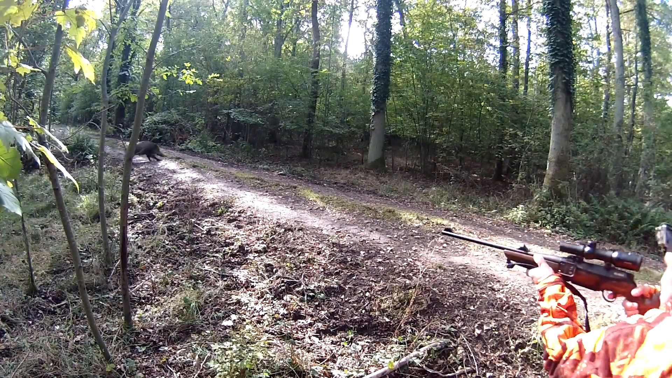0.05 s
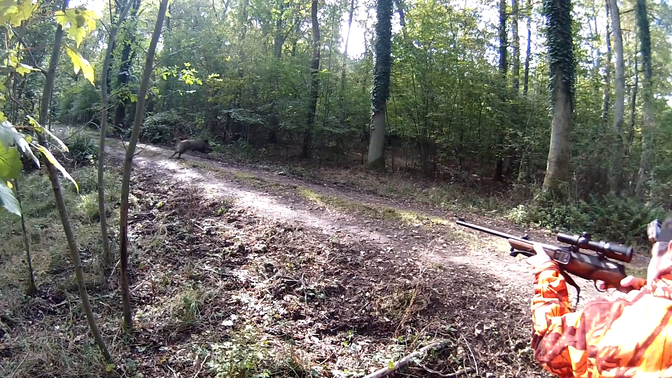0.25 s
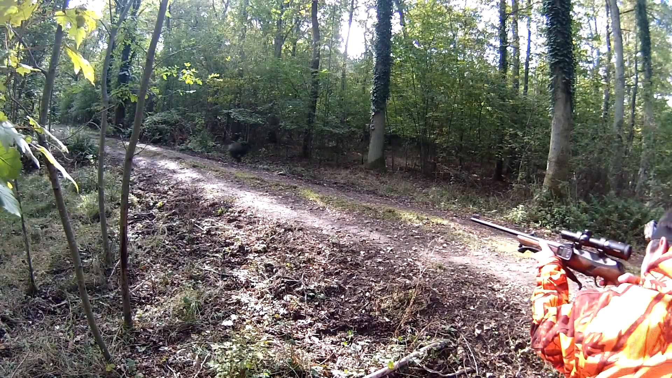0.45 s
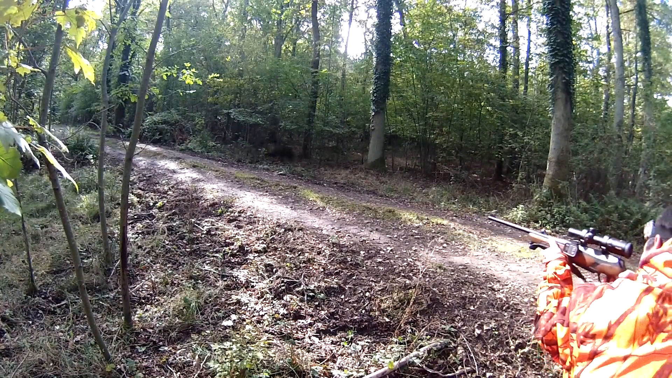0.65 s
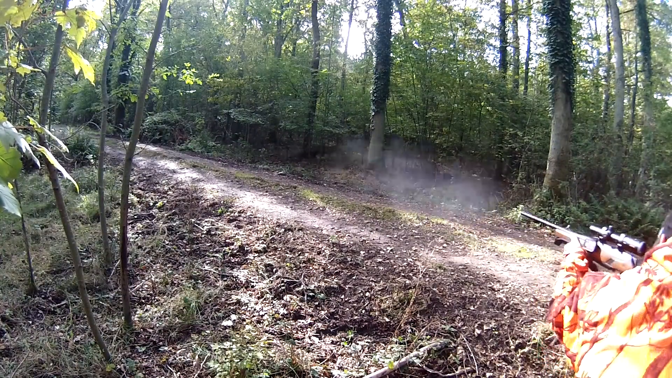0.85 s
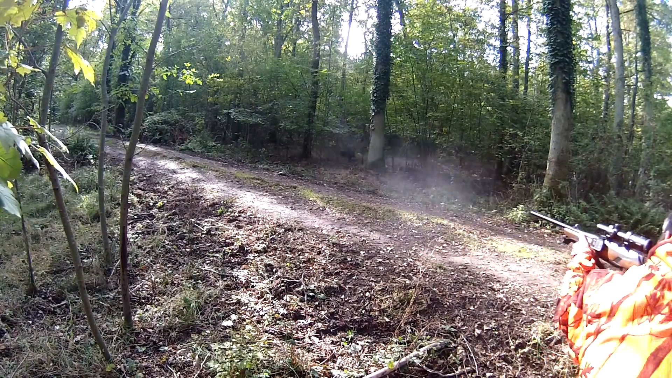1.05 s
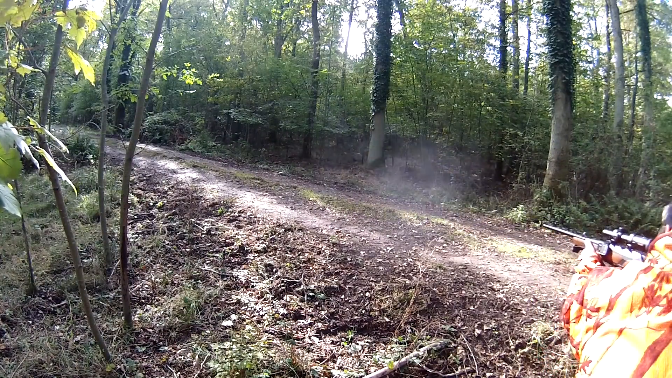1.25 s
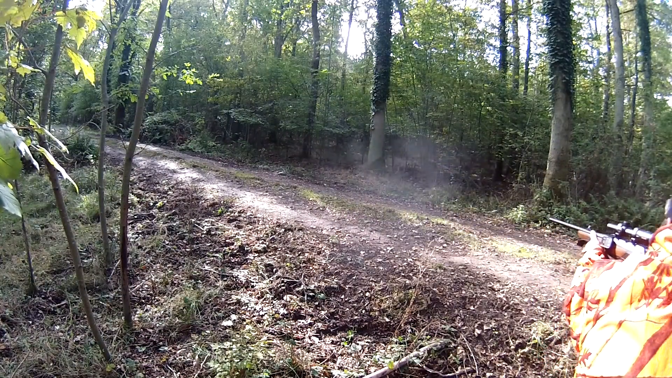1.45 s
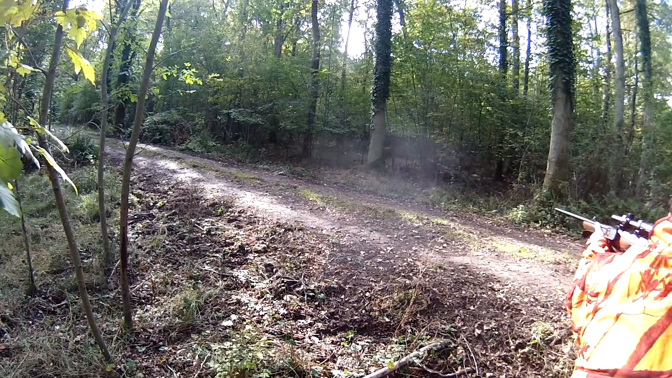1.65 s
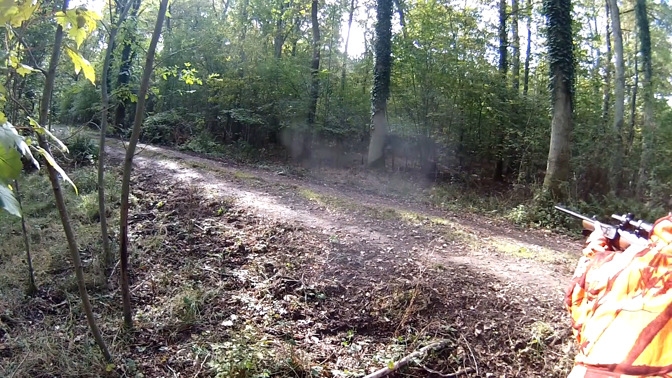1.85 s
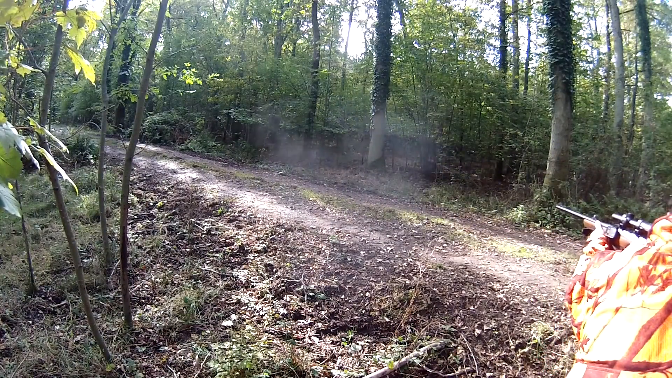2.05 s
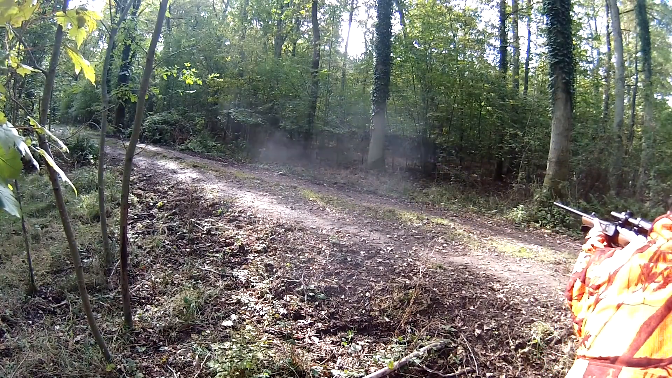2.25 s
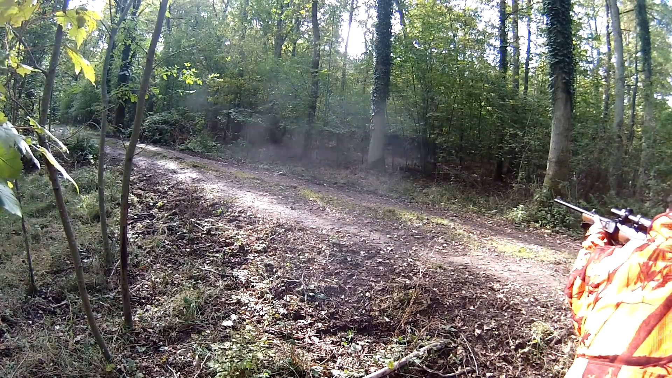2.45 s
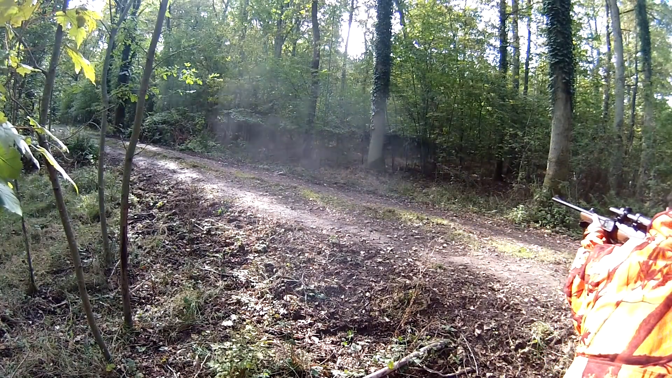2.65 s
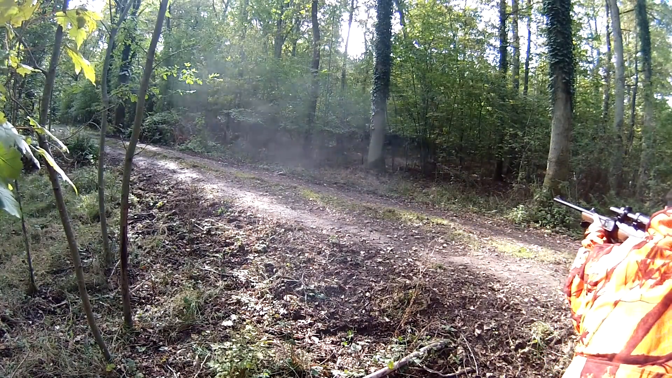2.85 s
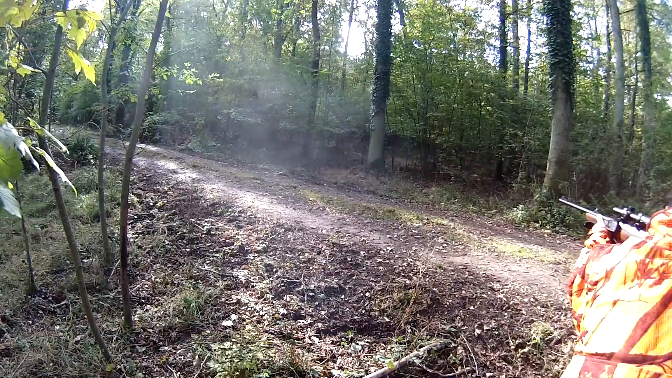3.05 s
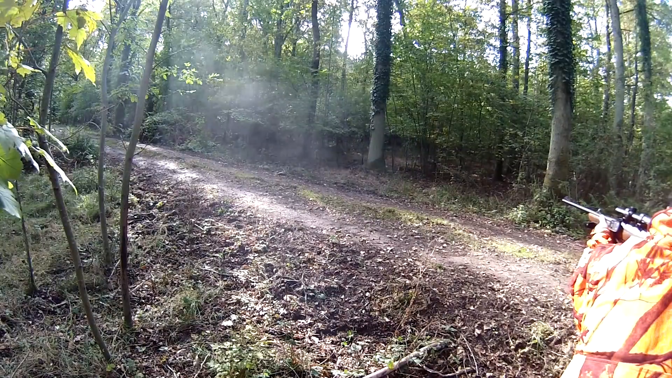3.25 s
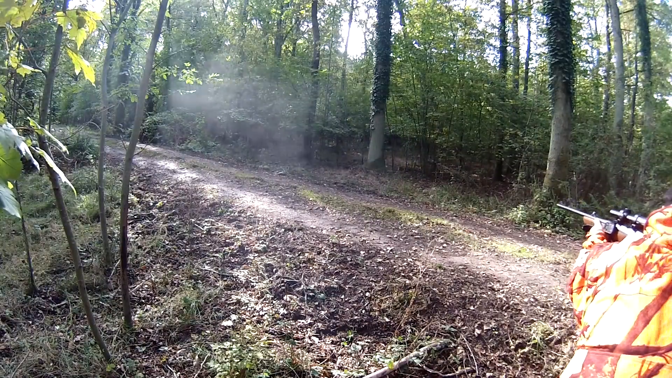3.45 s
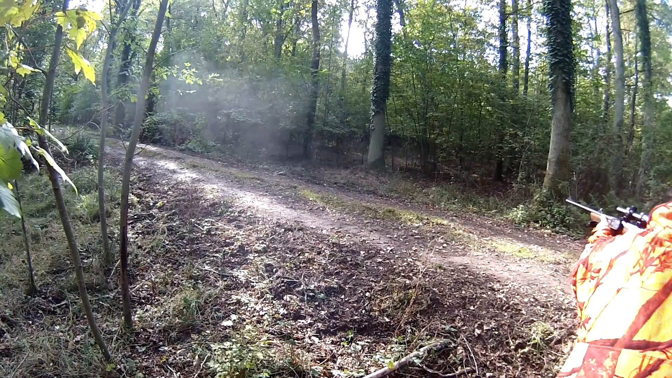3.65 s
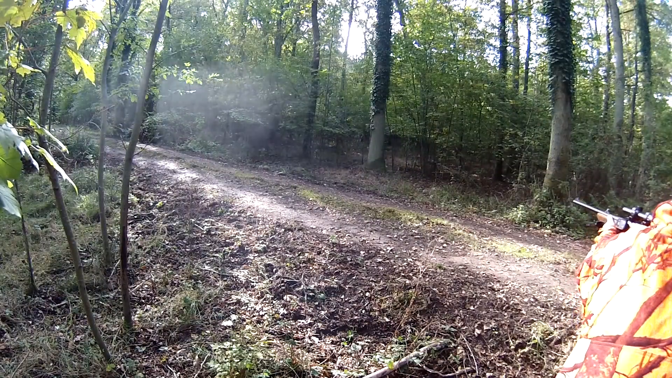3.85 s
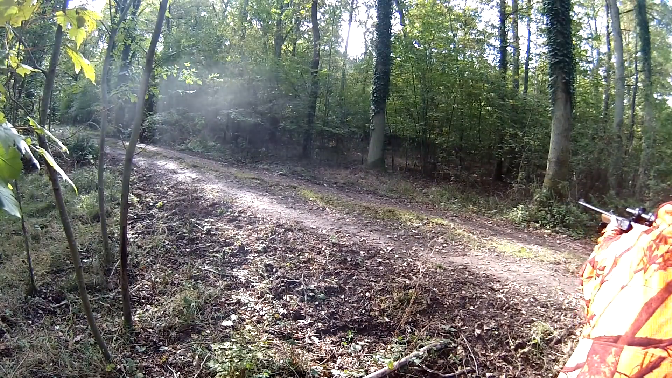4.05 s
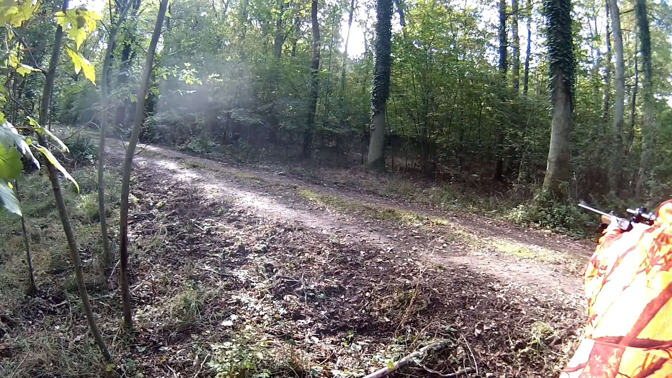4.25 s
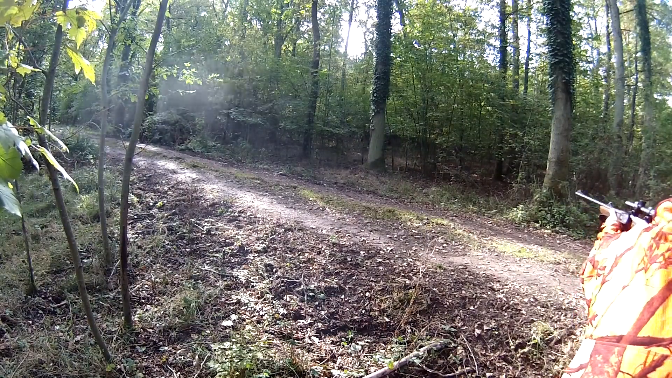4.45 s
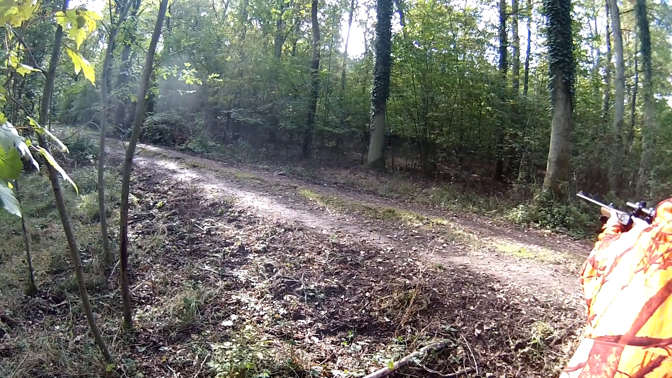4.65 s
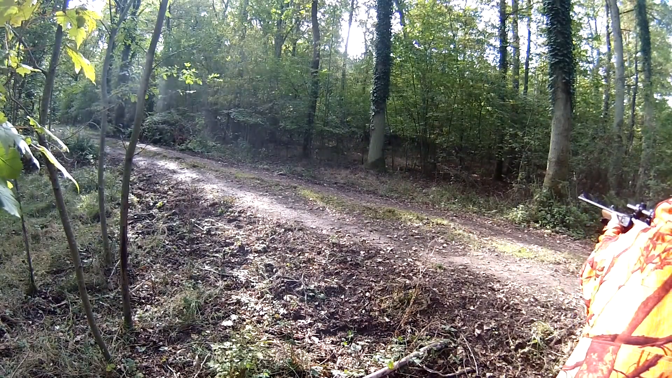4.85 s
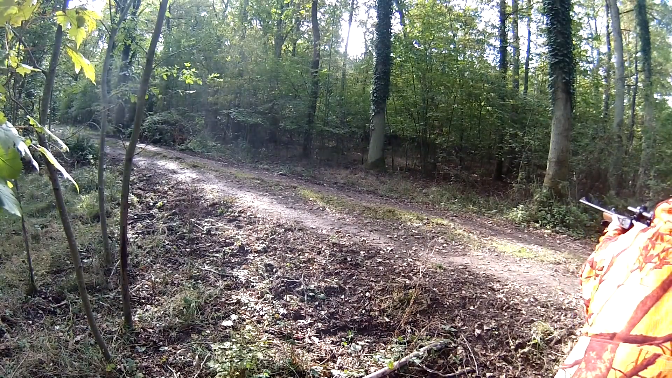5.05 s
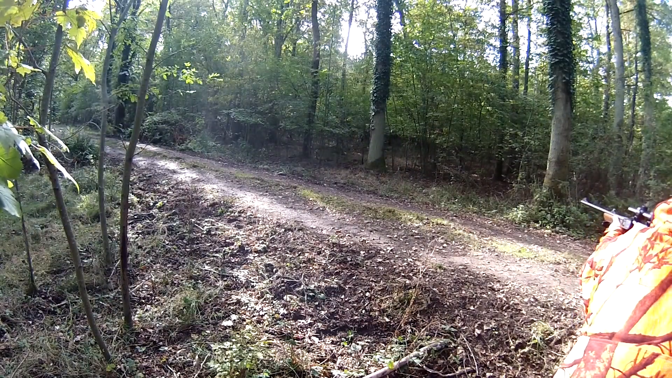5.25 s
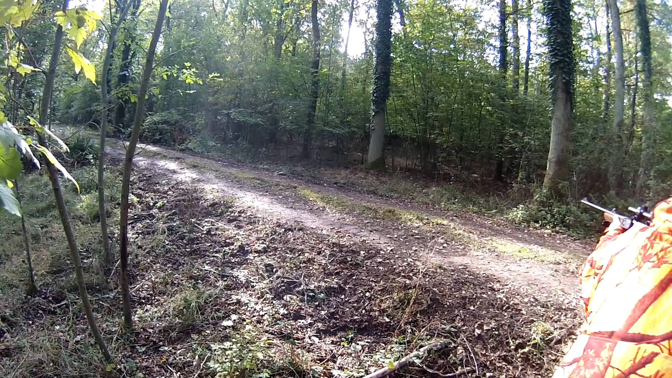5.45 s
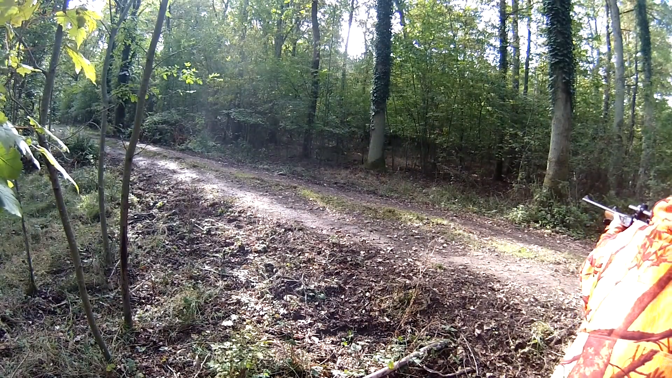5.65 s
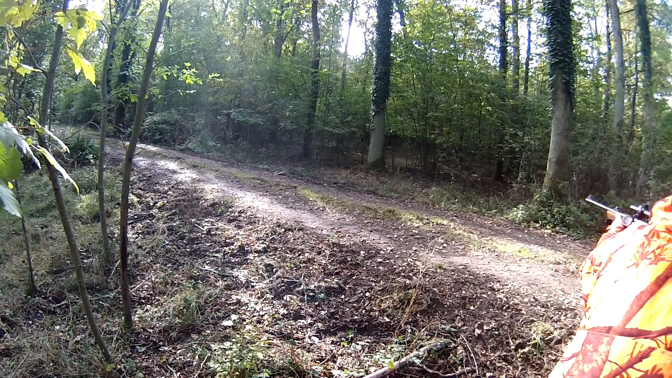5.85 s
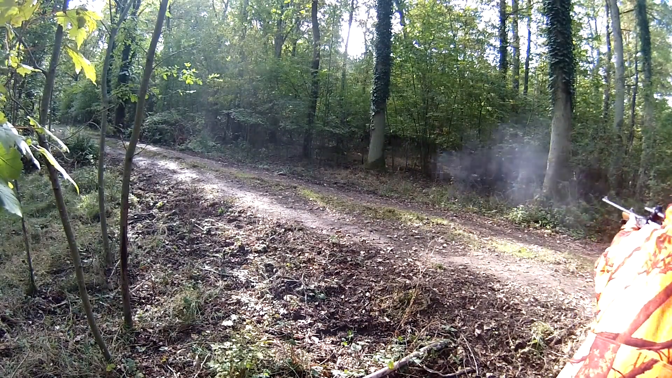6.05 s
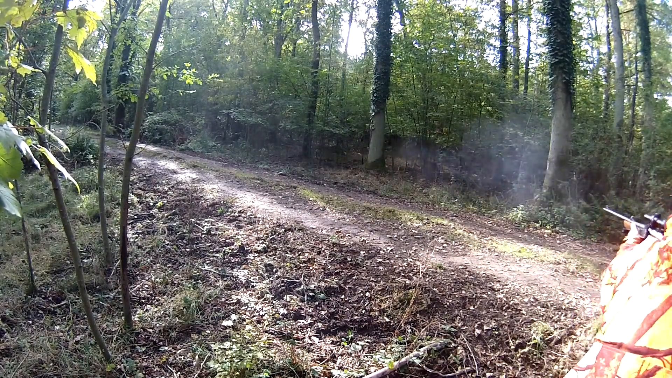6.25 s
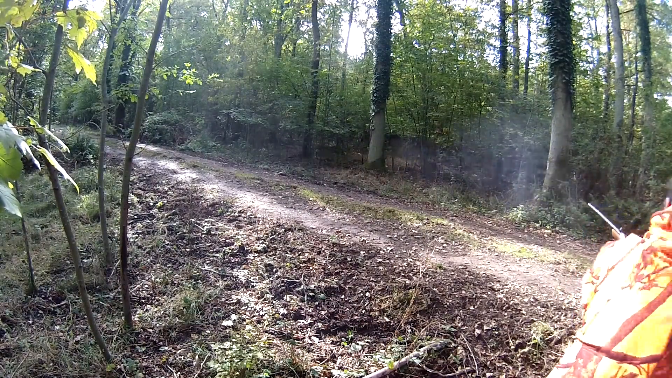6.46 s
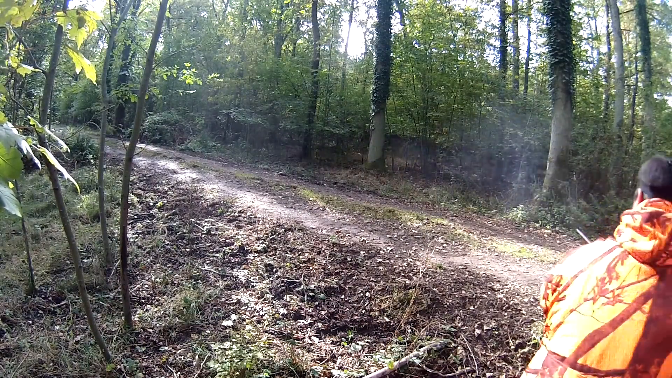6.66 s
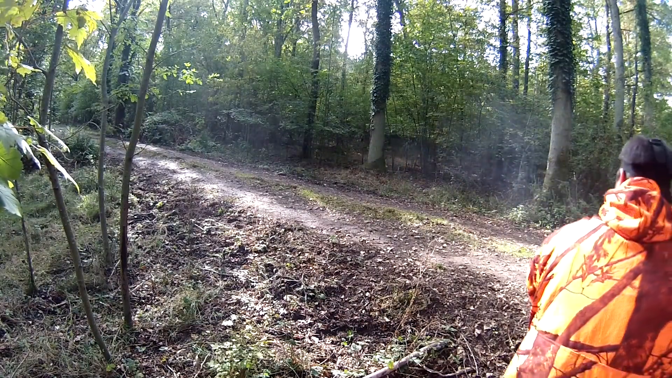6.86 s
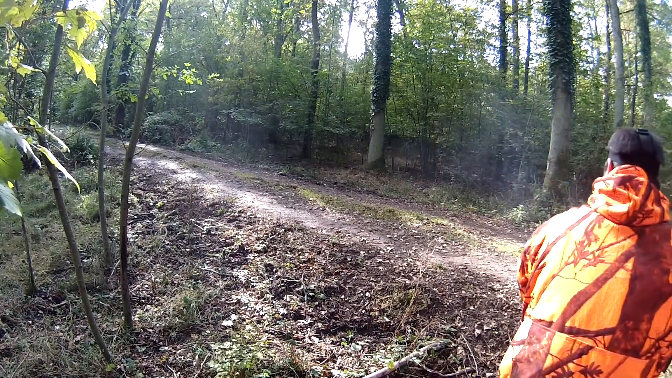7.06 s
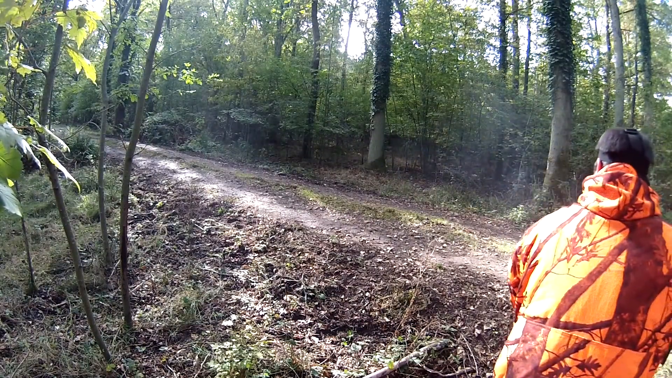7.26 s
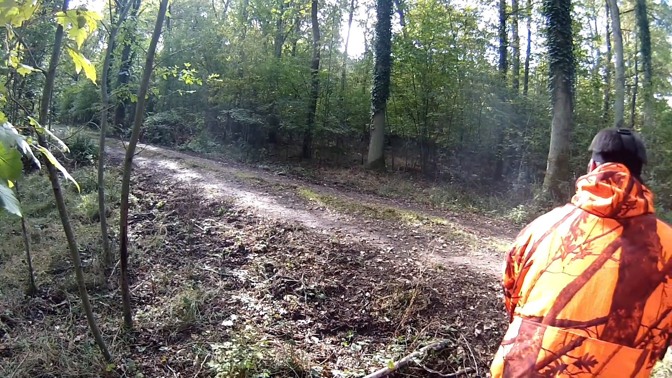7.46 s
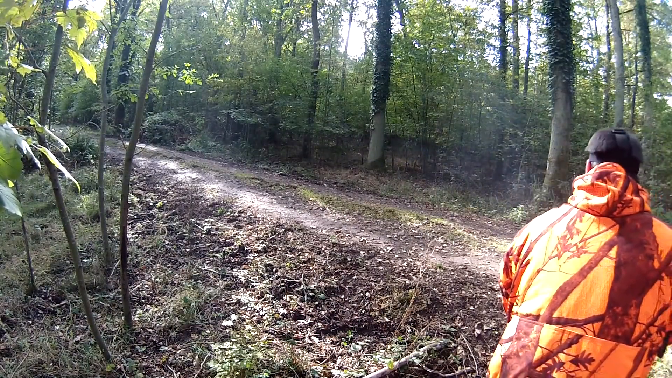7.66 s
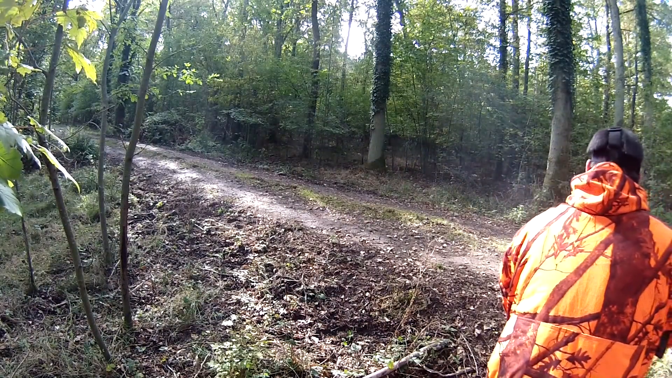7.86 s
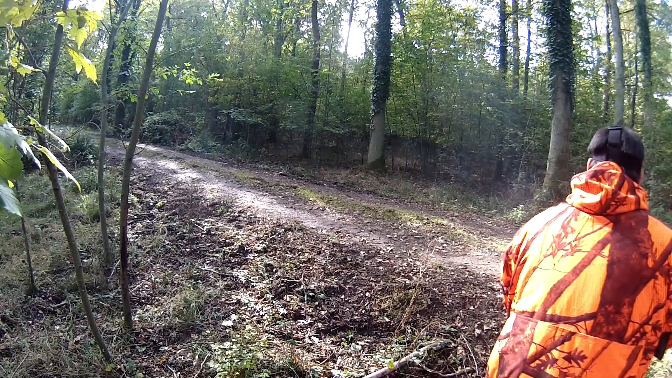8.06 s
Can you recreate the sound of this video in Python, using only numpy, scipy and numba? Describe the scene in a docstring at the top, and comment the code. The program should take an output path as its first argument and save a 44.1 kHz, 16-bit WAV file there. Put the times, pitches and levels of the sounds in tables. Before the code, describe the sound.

Two overloaded rifle shots, five seconds apart, each with a long rolling forest echo, and quick metallic bolt clatter between them.

```python
"""Two rifle shots in a wood

A bolt-action rifle fires twice on a forest track and is reloaded in between, over far rumble, hiss and a whine.
Shock pulses overload a microphone, slap back from the ground close by and from near trunks, and roll away as
decaying bands of noise. The bolt is noise driving steel resonances; handling ticks are noise bursts; a moan and
a dull roll come from afar. Gain control ducks at each blast and recovers over about a second, so the echo seems
to swell."""
import sys
import numpy as np
from scipy import signal
from scipy.fft import rfft, irfft
from scipy.io import wavfile
from numba import njit

SR = 44100
rng = np.random.default_rng(int(sys.argv[2]) if len(sys.argv) > 2 else 0)


def digitize_waveform(pressure):
    """Quantize a signal to 16-bit integers and store it at the path in sys.argv[1].

    Rows of a 2-D input are taken as channels; values are limited to [-1, 1].
    """
    field = np.atleast_2d(pressure).T
    bounded = np.clip(field, -1, 1)
    quanta = np.round(bounded * 32767).astype(np.int16)
    wavfile.write(sys.argv[1], SR, quanta)


N = 357542
T = np.arange(N) / SR


def undb(db):
    """Logarithmic level: decibels to amplitude gain."""
    return 10 ** (np.asarray(db) / 20)


def unit(x):
    """Power normalisation: scale to rms 1."""
    return x / np.sqrt(np.mean(x ** 2))


def at_pitch(hz, rows, axis=1):
    """Logarithmic frequency scale: interpolate one column of a table along it."""
    rows = np.array(rows)
    return np.interp(np.log(hz + 1e-9), np.log(rows[:, 0]), rows[:, axis])


def noise(spectrum):
    """Spectral shaping: white noise weighted by frequency, then scaled to rms 1."""
    frequencies = np.fft.rfftfreq(N, 1 / SR)
    white = rfft(rng.standard_normal(N))
    return unit(irfft(white * undb(at_pitch(frequencies, spectrum)), N))


def filt(x, hz, kind, order=2):
    """Causal filtering with a maximally flat (Butterworth) passband."""
    edges = np.clip(hz, 1, .49 * SR)
    return signal.sosfilt(signal.butter(order, edges, kind, fs=SR, output="sos"), x)


def resonate(x, hz, width):
    """Resonance: one damped mode with gain 1 at its centre."""
    return signal.lfilter(*signal.iirpeak(hz, hz / width, fs=SR), x)


def walk(rate):
    """Random modulation: `rate` random values a second joined by straight lines, scaled to rms 1."""
    count = N // SR * 100
    return unit(np.interp(T * rate, np.arange(count), rng.standard_normal(count)))


def held(t, hold, release):
    """Exponential decay after a hold: stays at 1 for `hold` seconds, then dies away."""
    return np.exp(-np.maximum(t - hold, 0) / release)


def add(out, s, x):
    """Superposition: mix x into out from time s on."""
    i = int(s * SR)
    out[i:i + len(x)] += x[:N - i]


def rumble(level_db=-58.5, swell_width_s=0.19, drift_rate=15, drift_db=1.1):
    """Amplitude-modulated noise: a far-off rumble rests at one level, drifts and swells now and then."""
    # colour of the rumble: f/Hz, relative level/dB
    colour = [(20, -15), (50, -7), (100, -6.5), (160, -0.5), (255, -0.5), (320, -6.5), (440, -2.5),
              (570, -9), (660, -6.5), (800, -14.5), (1100, -16), (2000, -24), (5000, -49)]
    # swells above the resting level: t/s, rise/dB
    swells = [(0, 5), (.72, 3.5), (3.68, 3), (5.22, 2)]
    swell = sum(db * np.exp(-((T - s) / swell_width_s) ** 2) for s, db in swells)
    return noise(colour) * undb(level_db + swell + drift_db * walk(drift_rate))


def moan(level_db=-52.5, blur_rate=50, direct=0.63, scatter=.9):
    """Multipath fading: a faint low moan holds its pitch, sinks and dies away, blurred by the trees."""
    start_hz, sink_hz, sinks_s, glide_s = 250, 42.2, 0.218, 0.054
    ends_s, release_s = 0.34, 0.035
    pitch = start_hz - sink_hz * (1 + np.tanh((T - sinks_s) / glide_s)) / 2
    phase = 2 * np.pi * np.cumsum(pitch) / SR
    # many paths add up to random in-phase and quadrature strengths
    paths = walk(blur_rate) * np.sin(phase) + walk(blur_rate) * np.cos(phase)
    return (direct * np.sin(phase) + scatter * paths) * undb(level_db) * held(T, ends_s, release_s)


def electronics(hiss_db=-67.5, whine_hz=10519, whine_db=-81):
    """Electrical self-noise: coloured microphone hiss and a thin steady sine whine (rms levels)."""
    # colour of the hiss: f/Hz, relative level/dB
    colour = [(100, -2.5), (2000, 3), (4600, -0.5), (6500, -4), (10000, -4.5), (15000, -9.5)]
    whine = np.sqrt(2) * np.sin(2 * np.pi * whine_hz * T)
    return undb(hiss_db) * noise(colour) + undb(whine_db) * whine


def handling_ticks():
    """Impulsive contact: light ticks of handling and twigs are short decaying bands of noise."""
    # ticks: t/s, initial level/dB, decay time/s, pitch inside the band f/Hz
    ticks = [(.015, -52, .002, 1500), (.130, -59, .02, 1500), (.144, -56, .012, 2600),
             (.1726, -48.5, .005, 2400), (2.345, -64, .025, 3000), (2.4564, -56, .007, 2800),
             (3.575, -65, .03, 2800), (3.633, -61, .006, 2200), (4.824, -55, .005, 3600)]
    out, t = np.zeros(N), T[:SR // 4]
    for s, db, decay, hz in ticks:
        band = unit(filt(rng.standard_normal(len(t)), [hz * 0.47, hz * 1.5], "bandpass"))
        add(out, s, undb(db) * band * np.exp(-t / decay))
    return out


def rifle():
    """Superposed paths: a first knock, the blast, slaps from the ground close by and from trunks, a short boom
    along the ground and the echo."""
    # shots: t/s, blast level before overload/dB, blast length/s, ground bounce lag/s, bounce length/s,
    # gas roar relative to blast/dB, echo and boom offset/dB, echo tilt/(dB per octave)
    shots = [(0.8262, 50.5, .0006, 0.0029, 0.0014, -2, -1.5, -0.66),
             (5.9789, 53, .0005, .0028, 0.0018, -7, -0.3, 0.3)]
    # reflections that answer every shot, first off the ground and shooter close by, then off near trunks: lag
    # t/s, level before filtering/dB, pulse length/s
    slaps = [(.0071, 35, .0009), (0.03, 23, .0016), (0.06, 17.5, .0018), (.116, 7.5, 0.002),
             (.142, 6.5, 0.0016)]
    lead_s, lead_db, lead_decay_s = 0.0027, -16, .0035
    boom_db, boom_decay_s, boom_band_hz = -4, .075, [105, 230]
    out, t, long = np.zeros(N), T[:SR // 10], T[:SR]
    for s, db, length, lag, bounce_length, gas_db, echo_db, tilt_db in shots:
        knock = unit(filt(rng.standard_normal(len(t)), [200, 1800], "bandpass"))
        add(out, s - lead_s, undb(lead_db) * knock * np.exp(-t / lead_decay_s))
        add(out, s, blast(db, length, lag, bounce_length, gas_db))
        add(out, s, undb(echo_db) * wood(tilt_db))
        boom = unit(filt(rng.standard_normal(len(long)), boom_band_hz, "bandpass", order=3))
        add(out, s, undb(echo_db + boom_db) * boom * np.exp(-long / boom_decay_s))
        for slap_lag, slap_db, slap_length in slaps:
            add(out, s + slap_lag, undb(slap_db) * slap(slap_length))
    return out


def shock(t, length):
    """Blast wave: a sudden rise in pressure that falls through zero into suction."""
    u = np.maximum(t, 0) / length
    return (t >= 0) * (1 - u) * np.exp(-u)


def blast(db, length, lag, bounce_length, gas_db, bounce=0.31, overload_db=34, drive_db=8):
    """Saturation: muzzle blast, ground bounce and gas roar are squared off by the overloaded capsule."""
    gas_decay_s, gas_hz = .0015, 2700
    dip_hz, dip_width_hz = 90, 55
    t = T[:SR // 10]
    gas = unit(filt(rng.standard_normal(len(t)), gas_hz, "lowpass")) * np.exp(-t / gas_decay_s)
    waves = shock(t, length) + bounce * shock(t - lag, bounce_length)
    pressure = undb(db) * (waves + undb(gas_db) * gas)
    squared = undb(overload_db) * np.tanh(pressure * undb(drive_db - overload_db))
    # the flat tops sag, as the microphone passes little bass
    sagging = filt(squared, 175, "highpass")
    # the thump is hollow at its bottom
    return sagging - resonate(sagging, dip_hz, dip_width_hz)


def slap(length, scatter_db=-15, scatter_decay_s=0.0041, scatter_hz=1500):
    """Reflection: the blast off one near surface, trailed by scatter from the bark and undergrowth around it."""
    t = T[:SR // 10]
    scatter = unit(filt(rng.standard_normal(len(t)), scatter_hz, "lowpass", order=1))
    reflected = shock(t, length) + undb(scatter_db) * scatter * np.exp(-t / scatter_decay_s)
    return filt(filt(reflected, 200, "highpass", order=3), 3200, "lowpass", order=4)


def wood(tilt_db, grain_db=0.5, merge_s=0.42, build_s=0.0009):
    """Multiple scattering: countless trunks return a roll that leaves and air make ever duller."""
    # scattering in the wood: f/Hz, relative level/dB, loss/(dB per s)
    scattering = [(40, -72.5, 7.5), (80, -58.5, 6.5), (142.1, -54, 12.5), (247.7, -41.5, 9.5),
                  (463, -37, 7), (1110, -33, 12), (1860, -30, 20), (3470, -31, 33.5), (4600, -32, 43.5),
                  (6420, -39, 50.5), (8900, -53, 72), (15000, -67.5, 120)]
    # level at first/dB, lag of the nearest trees/s, loss per tenfold (1 + t / near_trees_s)/dB
    echo_db, near_trees_s, spread_db = 29, 0.039, 20
    t = T[:4 * SR]
    # the strength is uneven at first and grows smooth as reflections merge
    grains = rng.standard_normal(len(t) // 32 + 1).repeat(32)[:len(t)]
    spread = np.log(undb(grain_db)) * np.exp(-t / merge_s)
    scatter = rfft(rng.standard_normal(len(t)) * np.exp(spread * grains - spread ** 2))
    octave = np.log2(np.fft.rfftfreq(len(t), 1 / SR) + 1)
    out = 0
    # overlapping triangular bands a quarter octave apart
    for hz in 31 * 2 ** (np.arange(37) / 4):
        share = np.maximum(0, 1 - 4 * np.abs(octave - np.log2(hz)))
        # offset the growth of bandwidth with frequency
        band = irfft(scatter * share) * np.sqrt(SR / (hz * np.log(2)))
        loss = at_pitch(hz, scattering, axis=2) * t
        out = out + band * undb(at_pitch(hz, scattering) - loss + tilt_db * np.log2(hz / 500))
    # the echo thins out as it comes back from ever farther trees
    distance_db = echo_db - spread_db * np.log10(1 + t / near_trees_s)
    return out * (1 - np.exp(-t / build_s)) * undb(distance_db)


def bolt():
    """Impact and friction: steel knocks, rebounds more dully, rattles on and scrapes along its rails."""
    # the bolt is lifted, drawn, pushed home and locked:
    # t/s, level before filtering/dB, decay time/s, brightness/(dB per octave), rebound relative level/dB
    knocks = [(4.073, -56, .006, -1, -10), (4.1072, -38, 0.0089, -4, -10), (4.133, -45, .008, 4, 7),
              (4.1643, -22, 0.0028, 7, -8.5), (4.200, -51, .004, 15, -10), (4.289, -41, 0.0085, -2, -12),
              (4.3135, -35, 0.0043, -1.5, -7.5), (4.333, -31, .0075, 2, -1)]
    # scrapes between the knocks: t/s, hold length/s, level before filtering/dB
    strokes = [(4.148, 0.022, -41), (4.301, 0.04, -43)]
    rebound_s, rebound_dull_db = .0058, 4  # delay; tilt lost per octave
    rattle_db, rattle_decay_s, rattle_bright_db = -21, .016, 8  # relative level; decay; tilt gained per octave
    attack_s, release_s, scrape_tilt_db = 0.018, 0.0089, -0.8
    out, t = np.zeros(N), T[:SR // 4]
    for s, db, decay, tilt_db, rebound_db in knocks:
        strike = np.exp(-t / decay)
        rattle = np.exp(-t / rattle_decay_s)
        add(out, s, undb(db) * steel(strike, tilt_db))
        add(out, s + rebound_s, undb(db + rebound_db) * steel(strike, tilt_db - rebound_dull_db))
        add(out, s + rebound_s, undb(db + rattle_db) * steel(rattle, tilt_db + rattle_bright_db))
    for s, length, db in strokes:
        friction = np.minimum(t / attack_s, 1) * held(t, length, release_s)
        add(out, s, undb(db) * steel(friction, scrape_tilt_db))
    return filt(filt(out, 260, "highpass"), 8600, "lowpass", order=4)


def steel(force, tilt_db, grit_db=1.5, crack_db=-7):
    """Modal excitation: a burst of tiny impacts follows the force and rings the action and stock."""
    # resonances of the action and stock: f/Hz, width/Hz, relative level/dB
    modes = [(410, 160, -9), (810, 320, 8), (1152, 320, -11), (1344, 225, 17.5), (1960, 290, 13.5),
             (2400, 370, 12.5), (3370, 250, 9), (3760, 280, 4.5), (4400, 380, 1.5), (5010, 200, 3),
             (6600, 1300, -17.5), (9250, 1400, -19.5)]
    impacts = rng.standard_normal(len(force)) * undb(grit_db * rng.standard_normal(len(force)))
    steady, burst = 0, 0
    for k, (hz, width, mode_db) in enumerate(modes):
        # neighbouring modes swing in opposite senses, which fills the valleys between them
        gain = (-1) ** k * undb(mode_db + tilt_db * np.log2(hz / 2500))
        steady = steady + gain * resonate(impacts, hz, width)
        burst = burst + gain * resonate(impacts * force, hz, width)
    crack = unit(filt(rng.standard_normal(len(force)), [500, 4200], "bandpass")) * force
    # the unshaped ringing sets the level, so short bursts are not boosted
    return burst / np.std(steady) + undb(crack_db) * crack


def tree_echo(sound, echo_db=-20.5, t60_s=.78):
    """Reverberation by convolution: the trees answer faintly with exponentially decaying noise."""
    t = T[:SR]
    echo = filt(rng.standard_normal(SR), [1400, 6500], "bandpass") * undb(-60 * t / t60_s)
    return undb(echo_db) * signal.fftconvolve(sound, echo / np.linalg.norm(echo))[:N]


def steel_ping(start_s=4.165):
    """Beating of close modes: the steel rings on as the bolt hits its stop."""
    # ringing modes: f/Hz, initial level/dB, time to fall 60 dB t/s
    partials = [(9694, -55, .25), (9703, -58, .25)]
    out, t = np.zeros(N), T[:SR // 4]
    for k, (hz, db, t60) in enumerate(partials):
        decay = np.exp(-np.log(1000) * t / t60)
        add(out, start_s, (-1) ** k * undb(db) * decay * np.sin(2 * np.pi * hz * t))
    return out


def distant_roll(peak_s=5.32, peak_db=-51.5, rise_db_per_s=61, fall_db_per_s=55):
    """Exponential growth and decay: a dull roll of noise from far away swells to a peak and ebbs."""
    # colour of the roll: f/Hz, relative level/dB
    colour = [(100, -23.5), (300, -8), (390, -2.5), (470, -6.5), (540, 1), (640, -6.5), (760, -5.5),
              (1200, -16), (1800, -28), (4000, -54)]
    since = T - peak_s
    return noise(colour) * undb(peak_db + np.minimum(rise_db_per_s * since, -fall_db_per_s * since))


@njit
def follow(x, attack, release):
    """Peak detection: rises quickly with the sound and sinks at a steady rate in dB."""
    out, e = np.empty(len(x)), 0.
    for i in range(len(x)):
        if x[i] > e:
            e = e + attack * (x[i] - e)
        else:
            e = e * release
        out[i] = e
    return out


def scene(channel_hiss_db=-75, port_hz=4550, port_width_hz=450, port_db=-7):
    """Superposition at one microphone whose port resonates; each channel adds its own treble hiss."""
    far = rumble() + moan() + distant_roll()
    handling = handling_ticks() + bolt()
    air = far + rifle() + handling + tree_echo(handling) + steel_ping()
    mono = air + undb(port_db) * resonate(air, port_hz, port_width_hz) + electronics()
    # channel_hiss_db is the level of the white noise before its bass is removed
    return mono + undb(channel_hiss_db) * filt(rng.standard_normal((2, N)), 1500, "highpass")


def record(dry, ceiling=1.223, attack_s=0.00088, recover_db_per_s=31.5, top_hz=15350):
    """Dynamic range compression: gain ducks at each blast and recovers; the converter clips and cuts the top."""
    attack = 1 - np.exp(-1 / (attack_s * SR))
    release = float(undb(-recover_db_per_s / SR))
    # the first channel steers the gain of both
    envelope = follow(np.abs(dry[0]), attack, release)
    gain = ceiling / np.maximum(envelope / 1.173, ceiling)
    clipped = np.clip(dry * gain, -1, 1)
    return signal.sosfilt(signal.ellip(8, .2, 70, top_hz, fs=SR, output="sos"), clipped)


dry = scene()
out = record(dry)
digitize_waveform(out)
```